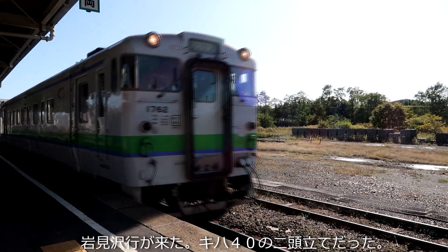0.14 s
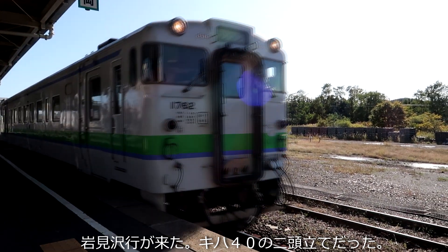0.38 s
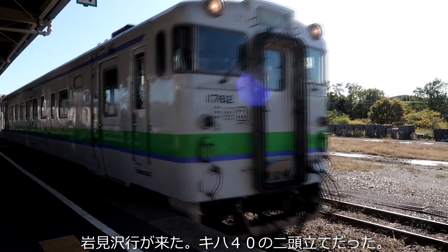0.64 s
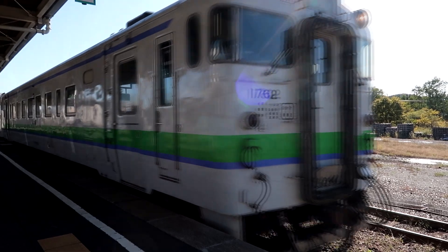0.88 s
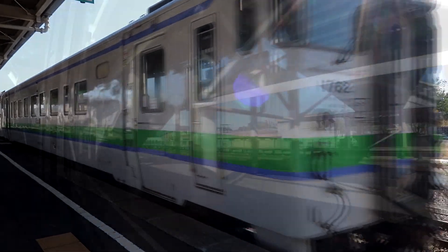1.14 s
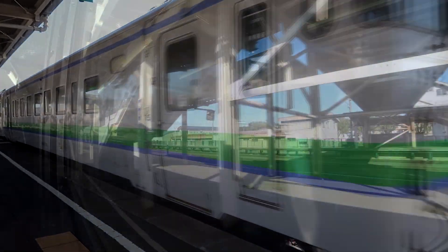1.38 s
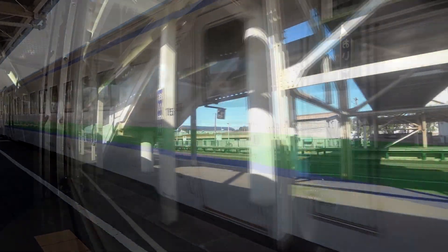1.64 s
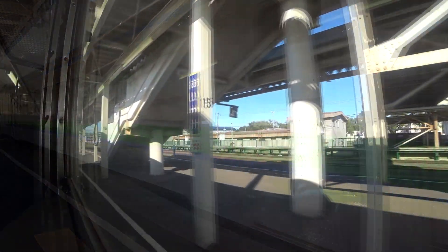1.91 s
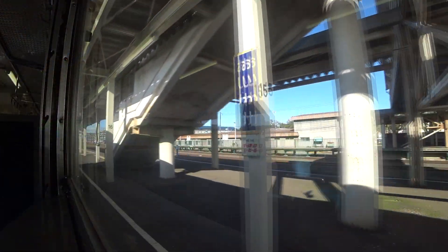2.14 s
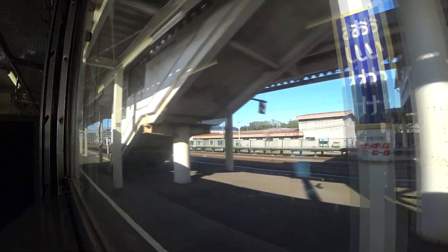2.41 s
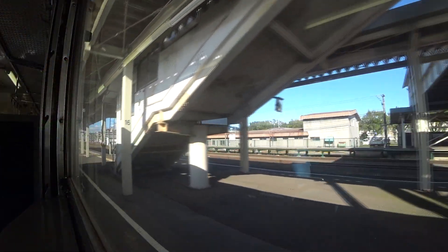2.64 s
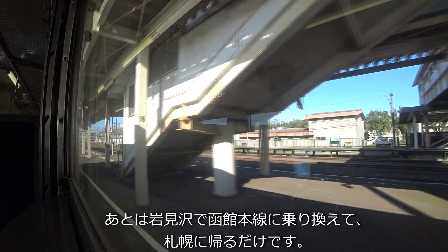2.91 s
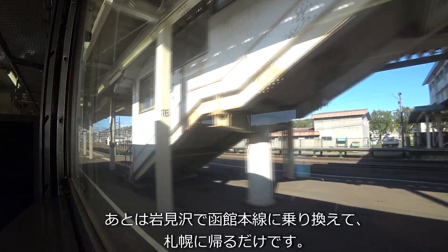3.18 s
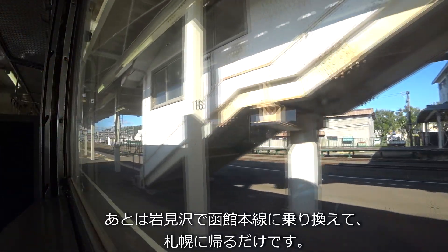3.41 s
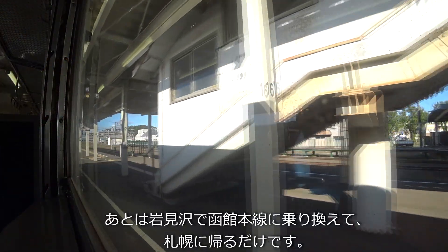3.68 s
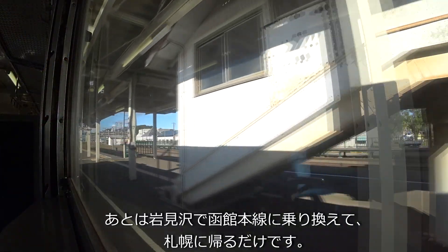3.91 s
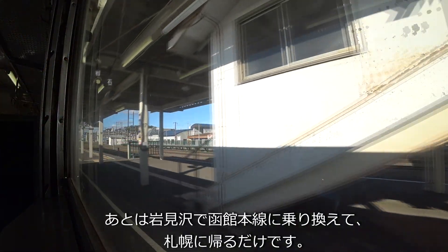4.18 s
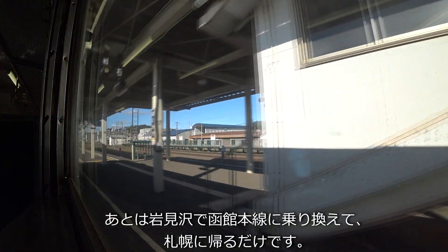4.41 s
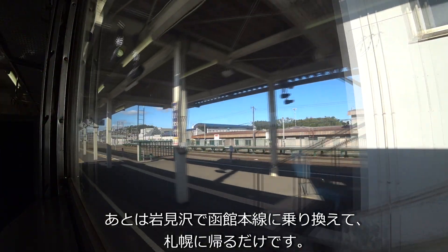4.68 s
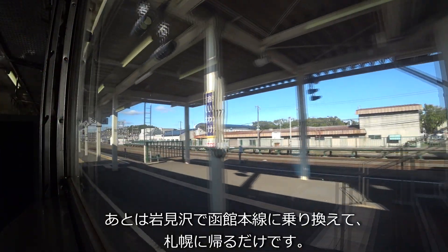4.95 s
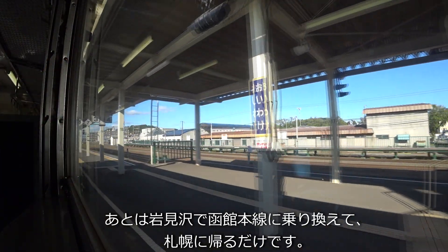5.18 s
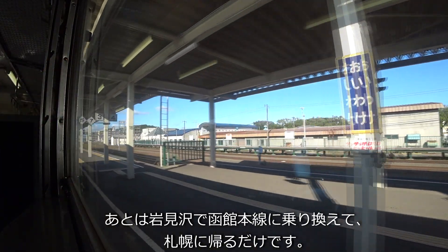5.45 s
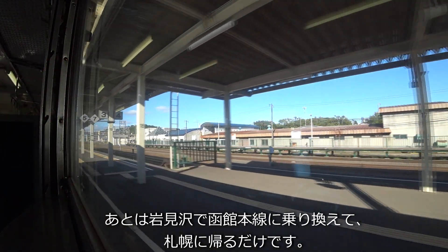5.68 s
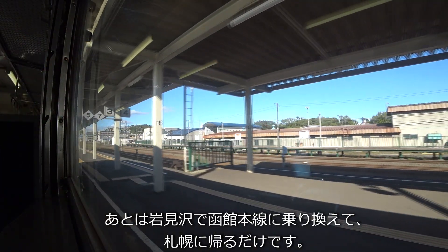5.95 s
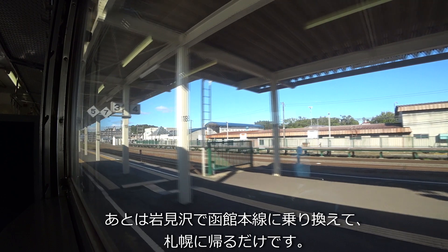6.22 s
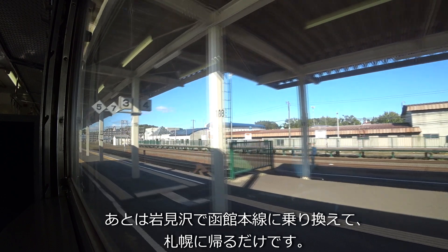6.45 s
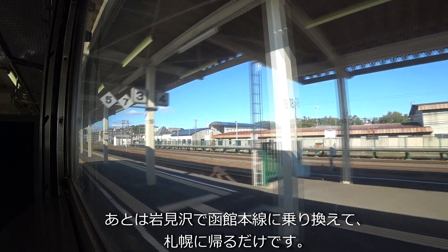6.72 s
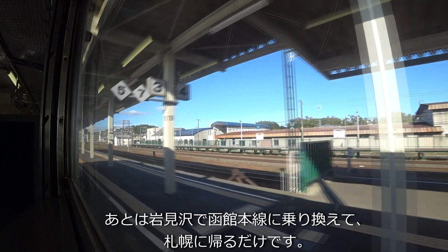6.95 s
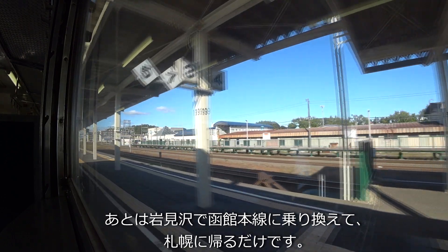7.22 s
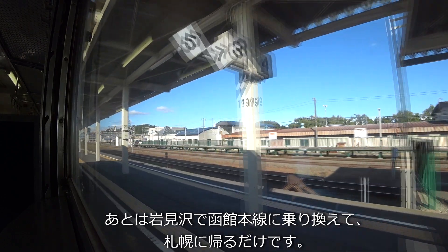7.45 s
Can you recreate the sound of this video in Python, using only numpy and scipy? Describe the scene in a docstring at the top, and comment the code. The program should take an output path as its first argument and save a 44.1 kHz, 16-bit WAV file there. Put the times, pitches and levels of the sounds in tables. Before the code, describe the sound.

A diesel railcar roars and squeals past a station platform with heavy joint thumps, then dissolves into a quieter chugging cabin drone with slowly rising gear whine.

```python
"""Railcar from platform to cabin

A diesel railcar rolls in along a platform: filtered noise roars, narrow noise squeals, a wheel sings, joints thump.
The sound dissolves to the cabin as the car pulls away: sines make the engine orders and rising gear whines,
shaped noise makes the body rumble and a puff of air.
The cabin is heard through a microphone pair whose side signal runs in quadrature with the mid."""
import sys
import numpy as np
from scipy import signal
from scipy.fft import rfft, irfft, next_fast_len
from scipy.io import wavfile

SR = 44100
rng = np.random.default_rng(int(sys.argv[2]) if len(sys.argv) > 2 else 0)


def generate_wav(signal):
    """Clip the signal to [-1, 1] and save it as 16-bit WAV at the path in sys.argv[1]."""
    frames = np.transpose(np.atleast_2d(signal))
    scaled = np.clip(frames, -1, 1) * 32767
    pcm = np.round(scaled).astype(np.int16)
    wavfile.write(sys.argv[1], SR, pcm)


def volts(x):
    """Linear amplitude factor 10**(x/20) for a level x in dB, scalar or array-like."""
    e = np.asarray(x, float) / 20
    return 10 ** e


N = 334719   # samples in the scene
LENGTH = next_fast_len(N + 8192)   # samples in a filter's transform
HZ = np.maximum(np.fft.rfftfreq(LENGTH, 1 / SR), 1)
TIME = np.arange(N) / SR
SIDES = np.array([[1], [-1]])   # left, right


def rms_one(x):
    """Scale to rms 1."""
    return x / np.sqrt(np.mean(x ** 2) + 1e-20)


def in_time(rows):
    """Turn the columns of a table into curves with a value per sample."""
    s, *columns = np.transpose(rows)
    return [np.interp(TIME, s, column) for column in columns]


def at_hz(points, hz, axis=1):
    """Read a column of a table on a log-frequency axis."""
    points = np.array(points)
    return np.interp(np.log(hz), np.log(points[:, 0]), points[:, axis])


def lifts(peaks, hz):
    """Sum bell-shaped resonances, in dB."""
    return sum(db / (1 + ((hz - centre) / width) ** 2) for centre, width, db in peaks)


def shaped(x, gain):
    """Filter by a gain per frequency; the end is mirrored so that it does not meet the start."""
    padded = np.concatenate([x, x[..., :2 * N - LENGTH - 1:-1]], axis=-1)
    return irfft(rfft(padded) * gain, LENGTH)[..., :N]


def above(hz):
    """Smooth share of the spectrum above a frequency."""
    return 1 / (1 + (hz / HZ) ** 4)


def drift(rate, at=TIME):
    """Chance curve through random points of spread 1, rate points per second."""
    knots = rng.standard_normal(400)
    return np.interp(at * rate, np.arange(len(knots)), knots)


def bell(s, rise_s, fall_s):
    """A smooth swell to 1 at time s."""
    t = TIME - s
    return np.exp(-.5 * (t / np.where(t < 0, rise_s, fall_s)) ** 2)


def many_modes(spread_db, apart_hz):
    """Ragged colour in dB of a body with many close resonances above 500 Hz."""
    knots = rng.standard_normal(700)
    return spread_db * above(500) * np.interp(HZ / apart_hz, np.arange(len(knots)), knots)


def in_ranges(noise, edges_hz, levels_db):
    """Split noise at the edges and give each range its own level curve."""
    highs = [np.ones_like(HZ)] + [above(hz) for hz in edges_hz] + [np.zeros_like(HZ)]
    ranges = [shaped(noise, low - high) for low, high in zip(highs, highs[1:])]
    return sum(volts(db) * x / np.std(x[0]) for db, x in zip(levels_db, ranges))


# arriving car, a row each for ground, rumble, low roar, high roar, hiss:
# level/dB, gain as it draws level/dB, share of the surges, fade start t/s, fade/(dB per s)
RANGES = [(-31.5, 4.5, .01, 1.65, 60), (-26.5, 1.5, 0.39, 1.72, 27), (-27, -.3, 1.05, 1.5, 25),
          (-28.5, -.3, 1.05, 1.69, 50), (-52, .3, 1.1, 1.66, 45)]
# lumpiness of each range: spread of level/dB
LUMPS_DB = [1.8, 1.3, 1.3, 1.2, .9]
# brief surges or dips: t/s, level/dB of the lower three ranges, level/dB of the upper two
SURGES = [(.88, -1.5, 0.5), (1.01, 0, 2.5), (1.375, 1.5, 3), (1.68, 2.5, 1), (1.8, 3.5, 0.5),
          (1.945, 12, -1), (2.07, 8, -2)]


def arrival():
    """Level of each range in dB: a step as the car draws level, random lumps, brief surges, then a fade."""
    near = TIME > 0.92
    gone_db = np.interp(TIME, (2.1, 2.2), [0, -60])
    surge_s = 0.022
    surges_db = sum(np.outer(db, bell(s, surge_s, surge_s)) for s, *db in SURGES)
    levels_db = []
    for k, (db, near_db, share, fade_s, fade_db) in enumerate(RANGES):
        lumps_db = LUMPS_DB[k] * drift(14.28)
        faded_db = gone_db - fade_db * np.maximum(TIME - fade_s, 0)
        levels_db.append(db + near_db * near + lumps_db + share * surges_db[k // 3] + faded_db)
    return levels_db


# tone colour of the arriving car within each range: f/Hz, level/dB (per Hz)
PASSING = [(15, -28), (25, -42), (49, 11), (101, 4.5), (134, 12), (169, 2.5), (208, 5.5), (299, -6),
           (430, -7), (799, -21), (1150, -21), (1730, -29.5), (3870, -36), (4290, -39.5), (12100, -63),
           (15700, -77), (22000, -120)]
# rail and wheel resonances: f/Hz, half width f/Hz, lift level/dB
RAILS = [(2350, 150, -1.5), (2680, 40, 3), (3150, 60, 3), (3520, 80, -2), (4250, 170, -4), (4500, 60, 4.5)]
# how wide the noise spreads: f/Hz, side against mid level/dB
PLATFORM_SIDE = [(60, -40), (110, -43), (190, -52), (350, -33), (620, -28), (1120, -18.5), (2010, -13.5),
                 (3600, -9), (6470, -2.5), (11600, 2)]


def rolling_noise(levels_db):
    """Wheels on rails roar as noise coloured by many resonances; returns mid and side."""
    colour = volts(at_hz(PASSING, HZ) + lifts(RAILS, HZ) + many_modes(1.5, 50.0))
    colours = colour * [np.ones_like(HZ), volts(at_hz(PLATFORM_SIDE, HZ))]
    noise = shaped(rng.standard_normal((2, N)), colours)
    return in_ranges(noise, [110, 400, 1100, 5500], levels_db)


def narrow(hz, width, wander):
    """Noise ringing in one sharp resonance whose pitch wanders."""
    ringing = shaped(rng.standard_normal(N), 1 / (1 + ((HZ - hz) / width) ** 2))
    read = np.arange(N) + np.cumsum(wander * drift(6.0))
    return rms_one(np.interp(read, np.arange(N), ringing))


# rail squeals that come and go: f/Hz, half width f/Hz, level/dB against the high roar
SQUEALS = [(1358, 10, -21.5), (2000, 40, -12.5), (2965, 20, -22.5), (3720, 45, -21), (3985, 18, -21.5),
           (4810, 45, -26)]
# share of its pitch by which each squeal wanders
SQUEAL_WANDER = [.004, .015, .004, .012, .002, .004]
# swells of the squeals: row of the squeal, t/s, level/dB, half length t/s
SQUEAL_SWELLS = [(0, .15, 4, .06), (1, .17, 5, .04), (1, .68, 5, .04), (1, .98, 4, .1), (1, 1.37, 5, .03),
                 (2, .14, 4, .07), (2, .76, 5, .04), (2, 1.36, 4, .05), (3, .17, 4, .04), (3, .44, 4, .04),
                 (3, .7, 3, .1), (3, 1.2, 4, .06), (4, .37, 6, .03), (4, .84, 4, .04), (4, 1.39, 6, .05),
                 (4, 1.69, 9, .07)]


def squeals(roar_db):
    """Sharp rail resonances ring on noise, flicker and swell, and follow the level of the high roar."""
    out = 0
    for k, (hz, width, db) in enumerate(SQUEALS):
        flicker_db = 2.2 * drift(14.0)
        swell_db = sum(up_db * bell(s, long_s, long_s)
                       for which, s, up_db, long_s in SQUEAL_SWELLS if which == k)
        out = out + volts(db + flicker_db + swell_db) * narrow(hz, width, SQUEAL_WANDER[k])
    return volts(roar_db) * out


# a wheel sings in bursts: t/s, peak level/dB, rise t/s, fall t/s
SONGS = [(.17, -32.5, 0.045, 0.031), (.29, -30, 0.027, 0.024), (.8, -33.5, 0.063, 0.044),
         (.93, -27.5, 0.029, 0.029), (1.58, -32, 0.017, 0.029), (1.68, -42, 0.044, 0.038)]


def wheel(roar_db):
    """One wheel mode, nearly a pure tone, hums with the roar and sings out in bursts."""
    hz = 1140 + 9 * drift(24.8)
    turns = np.cumsum(hz) / SR
    hum = volts(-47 + roar_db - RANGES[3][0])   # -47 dB while the roar is at its listed level
    bursts = sum(volts(db) * bell(s, rise, fall) for s, db, rise, fall in SONGS)
    flicker = volts(1.2 * drift(29.6))
    return np.sqrt(2) * (hum + bursts) * flicker * np.sin(2 * np.pi * turns)


# wheels over rail joints: t/s, level/dB
JOINTS = [(0.077, -21), (1.113, -16), (1.128, -8.5), (1.37, -13), (1.585, -30), (1.845, -15), (1.927, -29),
          (1.941, -24), (2.056, -19)]
# low modes that each thump sets ringing: f/Hz, level/dB, time to die away by 60 dB t/s
JOINT_MODES = [(70, -6, .09), (125, -3, .07), (175, -2, .06), (240, -7, .05), (420, -12, .04)]


def joints():
    """Each axle thumps the low modes of track and bogie, which ring and die away."""
    clicks, out = np.full(N, 1e-18), 0
    clicks[[round(s * SR) for s, db in JOINTS]] = volts(np.array(JOINTS)[:, 1])
    for hz, db, t60 in JOINT_MODES:
        r, w = volts(-60 / (t60 * SR)), 2 * np.pi * hz / SR   # decay and turn per sample
        ringing = signal.lfilter([0, np.sin(w)], [1, -2 * r * np.cos(w), r * r], clicks)
        out = out + volts(db) * ringing
    return shaped(out, 1 - above(700))


def platform():
    """Rolling noise in five ranges with squeals, a singing wheel and joints in the middle."""
    levels_db = arrival()
    roar_db = levels_db[3]
    mid, side = rolling_noise(levels_db)
    mid = mid + squeals(roar_db) + wheel(roar_db) + joints()
    return np.array([mid + side, mid - side])


# strong engine orders: multiple of the cycle, level/dB, change as the speed rises/(dB per s),
# left-right level/dB
ORDERS = [(6, -39, -.7, 8), (7, -44.5, -1.2, -2), (8, -50, 2.5, 0), (9, -47, -3, 5), (10, -35.5, .4, -6),
          (11, -42.5, -3, -3), (12, -38.8, -1.8, 6), (13, -41.5, -.8, 5), (14, -31, -2, 2),
          (16, -46, -.5, -1), (19, -47, .8, 0), (20, -50, 2.5, 0), (21, -48, -1, 0), (22, -47, .6, 0),
          (24, -33.7, .3, 0), (25, -48, .3, 0), (26, -49, 2, 0), (31, -45, .2, -5), (32, -43.5, 1, -6),
          (33, -44, .3, -2), (34, -47, 1.6, 0), (36, -44.5, 2.2, 4), (37, -41.5, -1.6, 4), (38, -52, -5, 3),
          (39, -49.5, .5, 0), (41, -45, .7, 0), (42, -46.5, 1.2, 0), (45, -50, -.2, 0), (55, -52, -.8, 0),
          (60, -54.5, -.8, 0), (63, -51.5, -.5, 0), (64, -53, -.6, 0), (68, -54, -.3, 0), (69, -57, 1.5, 0),
          (75, -56, .8, 0), (86, -59, 1.5, 0), (87, -57, 1.5, 0), (88, -60, 1.5, 0)]
# orders that pass over or between panel resonances: {multiple: bend/(dB per s squared)}
ORDER_BENDS = {14: -.65, 16: 1.3, 24: -.3, 37: -1.05}
# panel resonances turn the phase of all orders above them:
# order, turn/radians, change as the speed rises/(radians per s)
PANELS = [(8.5, .3, -.45), (11.5, -.8, .45), (12.5, 2.1, -.1), (14.5, .3, .1), (17.5, -.5, 0)]


def faint_orders():
    """Weaker engine orders up to 52, with levels and changes drawn at random."""
    strong = [row[0] for row in ORDERS]
    rows = []
    for k, (a, b) in enumerate(rng.standard_normal((53, 2))):
        if k > 7 and k not in strong:
            rows.append((k, -51 - .17 * k + 2.5 * a, 1.2 * b, 0))
    return rows


def engine(turns):
    """Orders are sines on the cycle; 9 to 14 keep nearly in step so it chugs, the others are scattered in phase."""
    out, slow = np.zeros((2, N)), TIME[::64]
    since = np.maximum(slow, 3.1) - 4.9   # levels change from 3.1 s and are as listed at 4.9 s
    turns = turns + .0016 * drift(9.0)   # firings differ in timing
    for k, db, db_per_s, lean_db in ORDERS + faint_orders():
        trend_db = db + db_per_s * since + ORDER_BENDS.get(k, 0) * since ** 2
        wander_db = (.8 + 1 * (k < 9)) * drift(2.0, slow)
        uneven_db = .8 * drift(11.0, slow)   # firings differ in strength
        level = np.interp(TIME, slow, volts(trend_db + wander_db + uneven_db))
        scatter = 2.2 if k < 9 or k > 45 else .15 if k < 15 else 1.35   # radians
        panel_turn = sum(turn + per_s * since for order, turn, per_s in PANELS if k > order)
        creep = .15 * drift(4.0, slow) + .25 * drift(.6, slow)   # panel phases creep, radians
        slip = np.interp(TIME, slow, panel_turn + scatter * rng.standard_normal() + creep)
        # panels carry some orders to one side; such a low order also shifts in time between the sides
        skew = abs(lean_db) / 5 * (8 < k < 17)
        wave = np.cos(2 * np.pi * k * turns + slip + SIDES / 2 * skew)
        out -= np.sqrt(2) * level * volts(SIDES / 2 * lean_db) * wave
    return out


# driveline speed: t/s, main gear mesh f/Hz
MESH = [(0, 155.4), (7.59, 264.8)]
# gear whines: multiple of the main mesh, level/dB before the floor lifts it
WHINES = [(1, -49), (1.594, -47.5), (1.66, -54), (2.13, -52), (2.48, -51)]
# floor panels that a whine excites as it sweeps through: f/Hz, half width f/Hz, lift level/dB
FLOOR = [(199.5, 5, 11), (206.5, 8, 18), (217, 6, 6), (255, 20, 8), (300, 20, 3), (339, 9, 13),
         (466, 8, 10), (512, 10, 7), (578, 12, 11)]


def gears():
    """Whines rise with the driveline speed and swell as they cross a floor resonance."""
    mesh_hz, = in_time(MESH)
    turns = np.cumsum(mesh_hz) / SR
    out = 0
    for k, db in WHINES:
        flicker_db = .8 * drift(5.0) + .6 * k * drift(16.0)
        level = volts(db + lifts(FLOOR, k * mesh_hz) + flicker_db)
        slip = .18 * k * drift(5.0) + .08 * k * drift(18.0)   # radians
        out = out + np.sqrt(2) * level * np.cos(2 * np.pi * k * turns + slip)
    return out


# tone colour of the cabin noise within each range: f/Hz, level/dB (per Hz)
CABIN = [(25, -3), (45, 1), (75, 0), (100, -10.5), (160, -2), (280, -11.5), (420, -7), (640, -20),
         (1200, -24), (1600, -24.5), (3400, -31.5), (5000, -37), (9600, -39.5), (10700, -47.5),
         (11400, -46), (20000, -100)]
# trim resonances: f/Hz, half width f/Hz, lift level/dB
CABIN_PEAKS = [(950, 60, 3), (1680, 150, 3), (2600, 250, 3), (3800, 200, 2.5), (4320, 290, 9.5),
               (6480, 300, 6), (7500, 130, 4), (8420, 250, 2)]
# cabin noise: t/s, rumble level/dB, drone level/dB, hiss level/dB
CABIN_LEVEL = [(2.4, -31, -40.5, -46), (4.2, -29, -41, -46), (4.4, -32, -40, -45), (4.85, -31, -39.5, -45),
               (5.1, -30.5, -42, -47.5), (7.59, -30, -43, -47.5)]


def cabin_noise(turns):
    """Body noise; a share repeats with every engine cycle, and the drone throbs with the firings."""
    rumble_db, drone_db, hiss_db = in_time(CABIN_LEVEL)
    colour = volts(at_hz(CABIN, HZ) + lifts(CABIN_PEAKS, HZ) + many_modes(.9, 40.0))
    size = 3500   # random points in one cycle of clatter
    clatter = np.interp(turns % 1 * size, np.arange(size + 1), rng.standard_normal(size + 1))
    throb_db = .7 * drift(3.0) + .8 * np.cos(2 * np.pi * turns)
    throb_db = throb_db + .3 * np.cos(8 * np.pi * turns) + .2 * np.cos(12 * np.pi * turns)
    lower_hiss_db = hiss_db + 1.2 * drift(11.0)   # lower and upper hiss waver apart
    upper_hiss_db = hiss_db - 11.5 + 1.4 * drift(9.0)
    white = rng.standard_normal((2, N))
    white[0] += .9 * shaped(rms_one(clatter), above(550) * (1 - above(1500)))
    levels_db = [rumble_db, drone_db + throb_db, lower_hiss_db, upper_hiss_db]
    return in_ranges(shaped(white, colour), [700, 1900, 5600], levels_db)


def air_puff():
    """A puff of air: a short swell of high noise with a few resonances."""
    # f/Hz, half width f/Hz, level/dB
    peaks = [(4300, 500, 5), (7050, 450, 8), (8600, 500, -10), (10450, 450, 16)]
    colour = above(2500) * (1 - above(10300)) ** 3 * volts(lifts(peaks, HZ))
    hiss = rms_one(shaped(rng.standard_normal(N), colour))
    return volts(-46.5) * bell(2.19, 0.03, 0.085) * hiss


# engine speed: t/s, four-stroke cycles per second f/Hz
CYCLE = [(1.2, 12.535), (3, 12.604), (5, 12.711), (7.59, 12.865)]
# microphone pair: f/Hz, lag of left behind right/radians, diffuse side against direct noise level/dB
PAIR = [(30, .2, -18), (52, .4, -10), (81.5, 0.72, 1), (128, 1.1, 10), (179, 1.8, 3.5), (250, 0.56, 13),
        (460, 2.34, 10.5), (700, 2.53, -8), (2960, 2.28, -24), (7000, 1.4, -6), (11000, .5, -3)]
# treble leans to one side: f/Hz, left-right level/dB
TREBLE_LEAN = [(2500, 0.5), (4000, 1.5), (8000, 5.5)]


def cabin():
    """All cabin sources through the microphone pair, whose sides lag and lead by a phase set per frequency."""
    turns = np.cumsum(in_time(CYCLE)[0]) / SR
    turns = turns - turns[round(6.168 * SR)]   # count from one of the firings that lead each cycle
    direct, diffuse = cabin_noise(turns)
    sources = engine(turns) + gears() + direct + air_puff()
    quadrature = 1 - 1j * SIDES * np.tan(np.clip(at_hz(PAIR, HZ), 0, 2.9) / 2)
    side = shaped(diffuse, volts(at_hz(PAIR, HZ, axis=2)))
    pair = shaped(sources, quadrature) + SIDES * side
    lean = volts(SIDES * at_hz(TREBLE_LEAN, HZ) / 2)
    return shaped(pair, lean * (HZ < 11000))   # the cabin microphone ends at 11000 Hz


def scene():
    """The platform dissolves into the cabin, which fades in from 0.7 to 1.74 s."""
    fade_in = np.interp(TIME, (0.7, 1.74), [0, 1])
    return platform() + fade_in * cabin()


def roll_off(x):
    """The treble ends steeply here."""
    return signal.sosfilt(signal.butter(12, 14260, fs=SR, output="sos"), x)


def record(dry):
    """Turn the finished mix into the sound that is written."""
    return roll_off(dry)


dry = scene()
out = record(dry)
generate_wav(out)
```